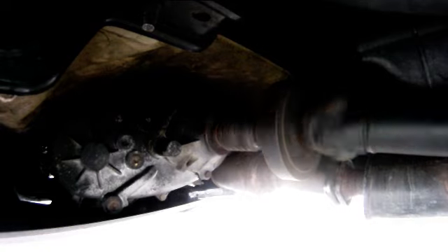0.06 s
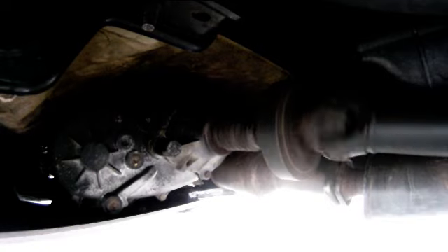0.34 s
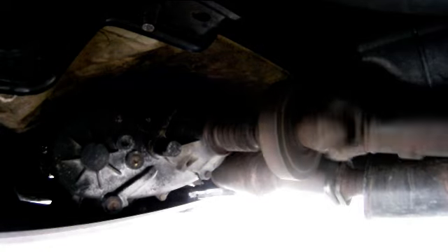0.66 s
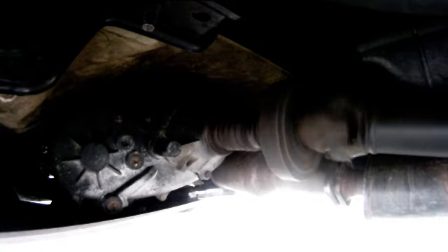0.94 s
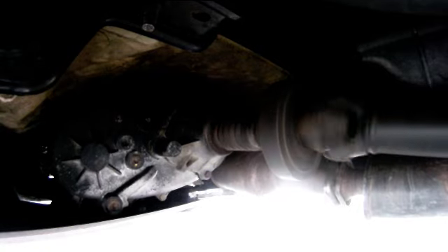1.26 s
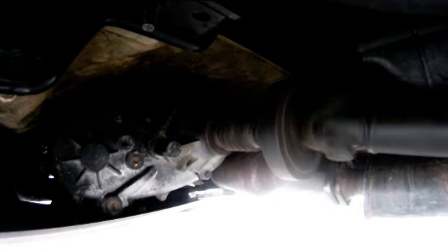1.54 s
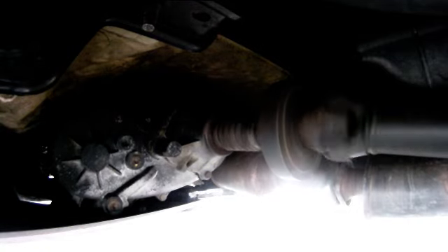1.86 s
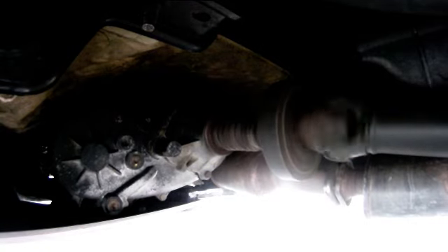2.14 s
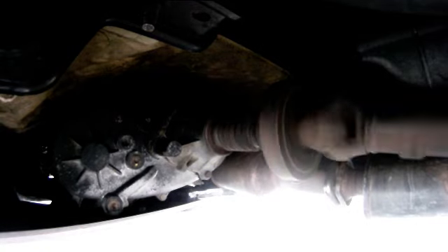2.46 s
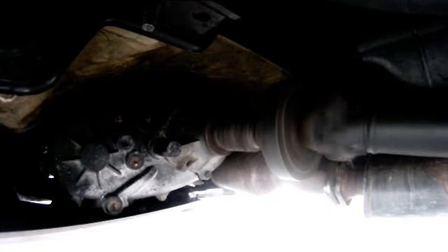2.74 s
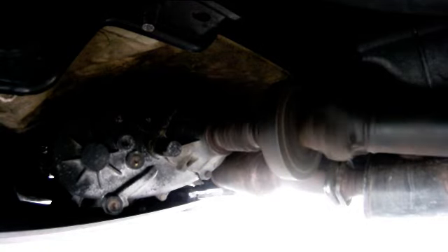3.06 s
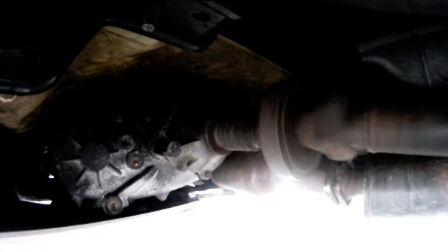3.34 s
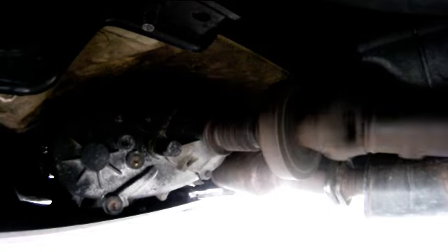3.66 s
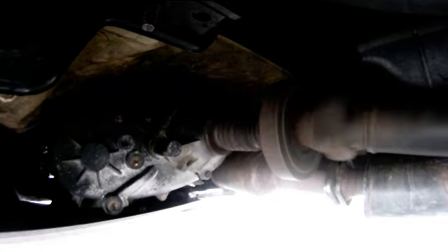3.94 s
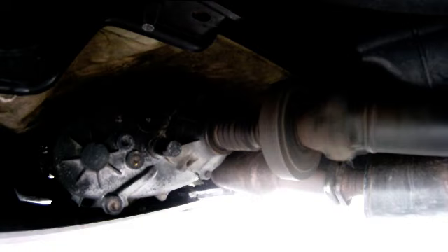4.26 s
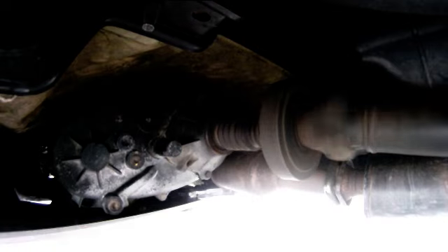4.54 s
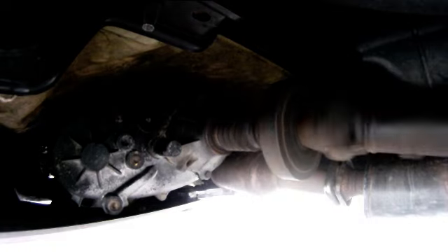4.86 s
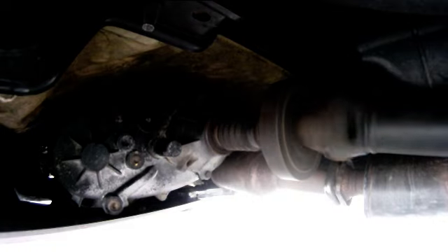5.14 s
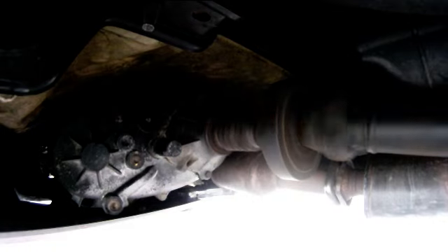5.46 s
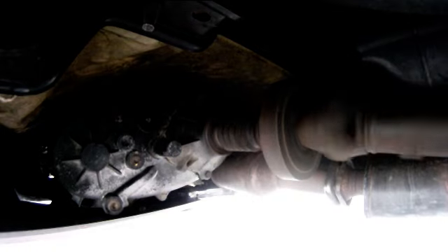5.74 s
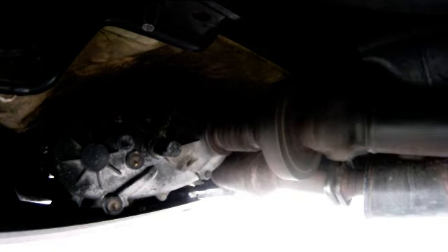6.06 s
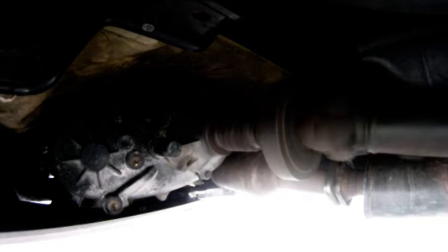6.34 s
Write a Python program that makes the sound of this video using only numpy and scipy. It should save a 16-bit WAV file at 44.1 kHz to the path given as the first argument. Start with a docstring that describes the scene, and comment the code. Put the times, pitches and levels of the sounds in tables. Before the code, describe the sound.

A diesel engine clatters close by, from beneath the floor of a vehicle, over the low hum of a turning drive shaft. The revs rise briefly, drop, then climb for longer with harder gear rattle and a booming exhaust, and fall again near the end. Occasional sharp steel clacks come from a slack joint, and the metallic clatter echoes tightly off the underbody panels.

```python
"""Under a vehicle with its four-cylinder diesel running and the drive shaft turning.
It opens on a short pull: firings knock, loaded gears rattle in their casing, the exhaust booms under
the floor. After a second the engine sinks back and the rattle thins, while the driveline hums on, slowly
gaining speed. From two seconds a longer, harder pull builds and sets the casing singing; the revs peak
just past five seconds, then ease off. Now and then, all the way through, a slack joint clacks shut."""
import sys
import numpy as np
from scipy import signal
from scipy.fft import rfft, irfft, next_fast_len
from scipy.io import wavfile
from scipy.ndimage import map_coordinates

SR = 44100
rng = np.random.default_rng(int(sys.argv[2]) if len(sys.argv) > 2 else 0)


def log_audio(samples):
    """Write samples as a 16-bit WAV file to the path given in sys.argv[1]."""
    # one column per channel
    frames = np.atleast_2d(samples).T
    # limit to full scale, then quantise
    limited = np.clip(frames, -1, 1)
    pcm = np.round(limited * 32767).astype(np.int16)
    wavfile.write(sys.argv[1], SR, pcm)


N = 286197


def amp(db):
    """Decibels to gain."""
    return 10 ** (np.asarray(db) / 20)


def unit(x):
    """Scale to rms 1."""
    return x / np.sqrt(np.mean(x ** 2) + 1e-20)


def along(points, hz):
    """An EQ curve: (Hz, dB) points read on a log frequency axis."""
    freqs, db = np.transpose(points)
    return np.interp(np.log(hz + 1), np.log(freqs), db)


def envelope(points):
    """Straight ramps through (seconds, value) points, one value a sample."""
    seconds, values = np.transpose(points)
    return np.interp(np.arange(N) / SR, seconds, values)


def wobble(per_second):
    """A smooth random drift with so many knots a second."""
    knots = rng.standard_normal(int(N * per_second / SR) + 4)
    return map_coordinates(knots, [np.arange(N) * per_second / SR])


def resonance(hz, centre_hz, width_hz):
    """Bell-shaped gain, 1 at the centre."""
    return 1 / (1 + (2 * (hz - centre_hz) / width_hz) ** 2)


def coloured(x, gain_db):
    """Minimum-phase EQ that follows gain_db(Hz), so peaks ring after the hit."""
    size = 2 ** 15
    cepstrum = irfft(np.log(amp(gain_db(np.fft.rfftfreq(size, 1 / SR)))), size)
    cepstrum[1:size // 2] *= 2
    cepstrum[size // 2 + 1:] = 0
    return signal.fftconvolve(x, irfft(np.exp(rfft(cepstrum)), size))[:N]


def noise(eq):
    """Noise of rms 1 shaped by an EQ curve."""
    return unit(coloured(rng.standard_normal(N), lambda hz: along(eq, hz)))


def impacts(per_second, spread_db):
    """Tiny blows at random moments, their sizes scattered by spread_db."""
    blows = (rng.random(N) < per_second / SR) * rng.choice([-1, 1], N)
    return unit(blows * amp(spread_db * rng.standard_normal(N)))


def surge(crank, depth_db, scatter_db):
    """A swell at every firing, no two equally strong."""
    firing = np.round(crank).astype(int)
    strength = rng.standard_normal(firing.max() + 1)[firing]
    swell = np.cos(2 * np.pi * crank)
    return unit(amp(depth_db * swell + scatter_db * strength * (1 + swell) / 2))


def casing(force, eq):
    """A force, shaped by its EQ curve, rings the gearbox casing."""
    # The casing's resonances and hollows. Each row: centre in Hz, width in Hz, boost or cut in dB.
    modes = [(470, 108, 6.4), (593, 123, 12.1), (647, 60, -8.8), (825, 107, 5.7), (888, 49, 10.8),
             (1086, 108, 3.6), (1153, 82, 14.7), (1253, 48, 7.0), (1290, 33, 9.0), (1412, 75, 5.6),
             (1490, 13, 6.3), (1605, 61, 7.1), (1956, 96, 4.3), (2136, 161, 5.0), (2357, 72, 9.1),
             (2838, 136, -6.3), (2940, 160, 5.8), (3261, 165, -4.4), (3690, 180, 4.7), (5237, 1080, 8.9),
             (6002, 656, -12.1), (6753, 1080, 8.9), (8377, 488, 7.3), (9016, 175, 6.5), (9641, 62, 8.5),
             (9942, 324, 5.9), (10396, 53, 6.1), (10722, 78, 8.5), (10849, 65, 12.0), (11115, 34, 8.9)]
    modes_db = lambda hz: sum(db * resonance(hz, centre, width) for centre, width, db in modes)
    return coloured(force, lambda hz: along(eq, hz) + modes_db(hz))


def underbody(x, wet_db, t60):
    """Short treble echoes between the panels colour the clatter with fine, steady peaks."""
    t = np.arange(SR // 10) / SR
    tail = rng.standard_normal(len(t)) * amp(-60 * t / t60)
    echoes = signal.fftconvolve(x, tail / np.linalg.norm(tail))[:N]
    low_cut = lambda hz: along([(1600, -29), (3200, -3.5), (9000, -1.0)], hz)
    return x + amp(wet_db) * coloured(echoes, low_cut)


def driveline(load_db):
    """The spinning shaft hums, rumbles and shakes the body: all grow with speed, the shudder with load."""
    # The pitch of the shaft. Each row: time in seconds, hum in Hz.
    hum_pitch = [(0, 100.7), (.3, 102), (1.2, 107.6), (3.4, 110.4), (4.8, 118.4), (5.8, 121), (6.49, 116.3)]
    # The sub-bass shake and the rumble above it. Each row: frequency in Hz, relative level in dB.
    shudder_eq = [(8, -23), (20, -17), (28, -7), (35, -6), (46, 3), (53, -1), (62, -27), (120, -77)]
    rumble_eq = [(40, -33.5), (75, 8.5), (95, -4.5), (130, 0), (175, -2.5), (230, -12.5), (340, -10.5),
                 (520, -14), (1000, -61)]
    hz = envelope(hum_pitch)
    speed = hz / hz.mean()
    hum = amp(-42.5 + 0.51 * wobble(5.3)) * speed ** 1.5 * np.sin(2 * np.pi * np.cumsum(hz) / SR)
    shudder = amp(-41 + .3 * load_db + wobble(3.8)) * speed ** 4.0 * noise(shudder_eq)
    rumble = amp(-43.5) * speed ** 4.3 * noise(rumble_eq)
    return hum + rumble + shudder


def exhaust(crank, rate, load_db):
    """The firing tone grows with load; its third harmonic swells as it crosses the pipe's resonance."""
    phase = 2 * np.pi * crank
    firing_tone = amp(-43.5 + .7 * load_db) * np.cos(phase)
    third = amp(-46) * resonance(3 * rate, centre_hz=144, width_hz=24) * np.cos(3 * phase)
    return firing_tone + third


def floor_boom(crank, rate, boom_hz, width_hz):
    """Gas pulses stir one deep resonance, which locks on to the firings when their rate comes near it."""
    # The swells of the boom under the floor. Each row: time in seconds, level in dB.
    swells = [(0, -28.5), (.18, -30.5), (.3, -57), (.48, -26.5), (.66, -41), (.75, -30), (.85, -40),
              (1.6, -44), (1.75, -37), (2.5, -34), (2.8, -40.5), (3.15, -34), (3.7, -40), (4.27, -27.5),
              (4.62, -34), (5.22, -24.5), (5.5, -29), (5.62, -42.5), (5.86, -27.5), (6.08, -34.5),
              (6.4, -26), (6.49, -35)]
    band_db = lambda hz: 20 * np.log10(resonance(hz, boom_hz, width_hz) + 1e-6)
    stirred = unit(coloured(rng.standard_normal(N), band_db))
    locked = 3 * resonance(rate, boom_hz, width_hz) ** 2 * np.cos(2 * np.pi * crank)
    swing = signal.hilbert(stirred + locked)
    boom = unit(swing.real / np.sqrt(np.abs(swing) ** 2 + .5))  # evens the swing from cycle to cycle
    waver_db = 2.5 * wobble(per_second=14)
    return amp(envelope(swells) + waver_db) * boom


def clacks(ring_t60, tick_t60):
    """A joint snaps its slack shut: a short cluster of steel modes and a bright tick."""
    # Each row: start in seconds, level in dB, ring pitch in Hz, tick offset in dB ahead of its EQ.
    hits = [(0.226, -22, 2370, -13), (1.3907, -19.5, 1570, -19), (3.273, -20, 2120, -17),
            (3.5154, -32, 2150, 2), (3.5792, -29.5, 3580, 5.5), (4.0587, -17.5, 1960, -14),
            (4.711, -13, 1935, -15), (5.6064, -18.5, 2000, -13)]
    # The brightness of the tick. Each row: frequency in Hz, gain in dB.
    tick_eq = [(400, -28), (2000, -11), (5000, -7), (7500, -14), (10200, 5.5), (11800, -52)]
    steel = [(.83, 0.36), (1, 0.62), (1.12, 0.2)]  # Each row: pitch ratio, gain.
    rings, ticks = np.zeros(N), np.zeros(N)
    t = np.arange(SR // 10) / SR
    for start, db, hz, tick_db in hits:
        span = slice(round(start * SR), round(start * SR) + len(t))
        ring = sum(gain * np.sin(2 * np.pi * hz * ratio * t) for ratio, gain in steel)
        rings[span] += amp(db - 60 * t / ring_t60) * ring
        ticks[span] += amp(db + tick_db - 60 * t / tick_t60) * rng.standard_normal(len(t))
    return rings + casing(ticks, tick_eq)


def singing(rate, load_db):
    """Under load, chatter keeps a few lightly damped casing modes ringing, each best at one speed."""
    # Each row: pitch in Hz, level in dB at full pull and best speed, dB gained per dB of load,
    # best speed in firings per second.
    modes = [(884, -43, 1, 52.3), (1152.5, -35.5, 1.1, 46.6), (1290, -39, 1.5, 54.4)]
    song = np.zeros(N)
    for pitch_hz, db, per_load, best_rate in modes:
        peak_db = lambda hz: 12 * np.log10(resonance(hz, pitch_hz, width_hz=30.5))
        ring = unit(coloured(impacts(per_second=900, spread_db=2), peak_db))
        song += amp(db + per_load * load_db) * resonance(rate, best_rate, width_hz=17) * ring
    return song


def tooth_blows(crank, jitter_s, spread_db, per_cycle):
    """Blows at crank angles that come back in every four-firing cycle, each a little early or late."""
    cycles = np.arange(-1, crank[-1] / 4)[:, None]
    angles = 4 * (cycles + rng.random(per_cycle))
    at = np.interp(angles, crank, np.arange(N), left=-SR, right=2 * N)
    at += jitter_s * SR * rng.standard_normal(angles.shape)
    sizes = rng.choice([-1, 1], per_cycle) * amp(spread_db * rng.standard_normal(angles.shape))
    inside = (at >= 0) & (at < N)
    return unit(np.bincount(at[inside].astype(int), sizes[inside], N))


def gears(crank, load_db):
    """Teeth rattle across their backlash, harder under load; their sharp edges add a fizz."""
    # The midrange rattle and the fizz on top. Each row: frequency in Hz, relative level in dB.
    rattle_eq = [(100, -27.5), (230, -20.5), (400, -12.5), (750, -12.5), (1200, -7.5), (2000, -6.5),
                 (2700, -15), (4000, -41), (7000, -76)]
    fizz_eq = [(1200, -55), (2400, -14.5), (3100, -12), (3700, -19.5), (4300, -30), (7700, -35),
               (9700, -19.5), (10900, -19.5), (11450, -30.5), (11900, -50), (12600, -40), (13300, -42)]
    teeth = tooth_blows(crank, jitter_s=.00008, spread_db=1.7, per_cycle=72)
    strays = 0.86 * impacts(per_second=4000, spread_db=1.5)
    blows = (teeth + strays) * surge(crank, depth_db=0.2, scatter_db=0)
    edges = impacts(per_second=6000, spread_db=1.5) * surge(crank, depth_db=0, scatter_db=1.7)
    rattle = amp(-28 + load_db) * unit(casing(blows, rattle_eq))
    fizz = amp(-37.5 + 0.92 * load_db) * unit(casing(edges, fizz_eq))
    return rattle + fizz


def knock(crank, crossover_hz):
    """Each firing shakes a burst of metallic clatter out of the engine, sharpest in the treble."""
    # The strength of the knock. Each row: time in seconds, level in dB.
    fader = [(0, -36), (.8, -41), (1.25, -39.5), (1.7, -38.5), (2.2, -37.5), (3, -39), (4, -39),
             (5.2, -33.5), (6, -35.5), (6.49, -34)]
    # The colour of the combustion force. Each row: frequency in Hz, relative level in dB.
    combustion_eq = [(100, -21.5), (230, -17), (370, -16.5), (750, -12), (1040, -13), (1200, -19),
                     (1700, -10.5), (2400, -9), (2800, -29), (3550, -17), (4300, -34), (7700, -38.5),
                     (9700, -21.5), (10900, -35), (11800, -37.5), (13300, -50)]
    sharp = impacts(per_second=12000, spread_db=1.5) * surge(crank, depth_db=8, scatter_db=1.2)
    even = impacts(per_second=6000, spread_db=0) * surge(crank, depth_db=1, scatter_db=-0.4)
    band = lambda x, side: signal.sosfilt(signal.butter(3, crossover_hz, side, fs=SR, output="sos"), x)
    force = band(sharp, "high") + band(even, "low")
    return amp(envelope(fader)) * unit(casing(force, combustion_eq))


def scene():
    """Engine speed and load drive the mix: clattering metal, echoing off the panels, over a bass bed."""
    # Engine speed. Each row: time in seconds, firings per second.
    revs = [(0, 44.98), (.55, 51.27), (1.02, 51.56), (1.45, 37.91), (2.0, 34.35), (2.8, 41.96),
            (3.3, 48.47), (4.5, 56.45), (5.2, 59.79), (5.75, 51.53), (6.49, 38.2)]
    # Gear load: pull, lull, long pull, easing off. Each row: time in seconds, dB against a full pull.
    load = [(0, -1.3), (.88, -0.05), (1.02, -4), (1.26, -11), (1.95, -9.5), (2.55, -6), (3.22, 0),
            (4.7, 0.3), (5.75, -0.64), (6.49, -5)]
    rate, load_db = envelope(revs), envelope(load)
    crank = .26 + np.cumsum(rate) / SR  # position, counted in firings
    joints = clacks(ring_t60=.04, tick_t60=.035)
    metal = knock(crank, crossover_hz=1500) + gears(crank, load_db) + singing(rate, load_db) + joints
    boom = floor_boom(crank, rate, boom_hz=62.03, width_hz=8.3)
    bass = exhaust(crank, rate, load_db) + boom + driveline(load_db)
    return (underbody(metal, wet_db=-6.5, t60=0.1) + bass)[None]


def record(dry):
    """A brick-wall low-pass takes off the very top of the treble."""
    top_hz = 13520
    size = next_fast_len(N + SR // 2)
    passband = np.fft.rfftfreq(size, 1 / SR) < top_hz
    return irfft(rfft(dry, size) * passband, size)[:, :N]


dry = scene()
out = record(dry)
log_audio(out)
```